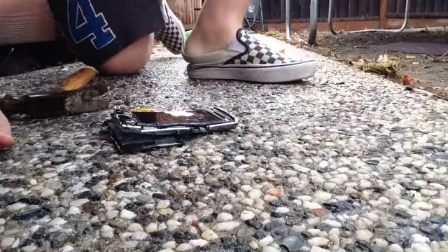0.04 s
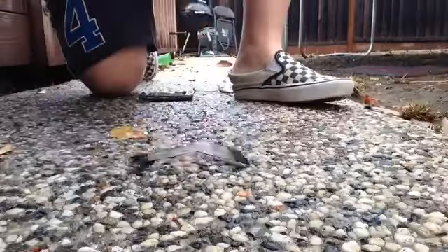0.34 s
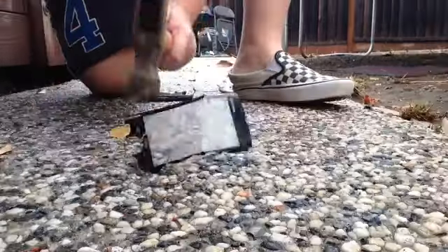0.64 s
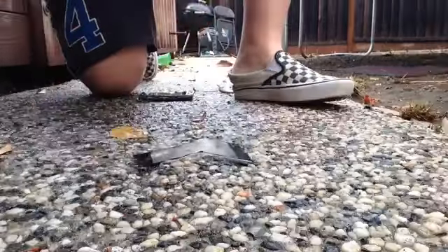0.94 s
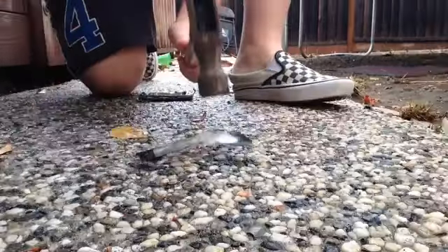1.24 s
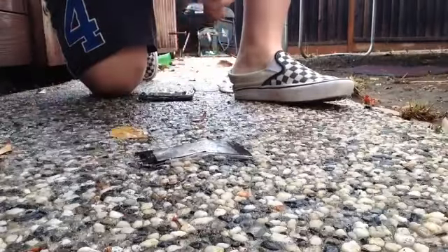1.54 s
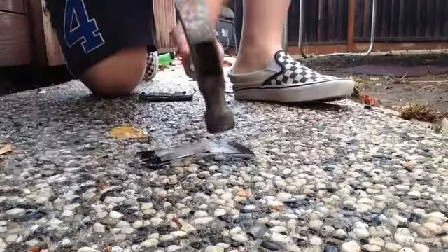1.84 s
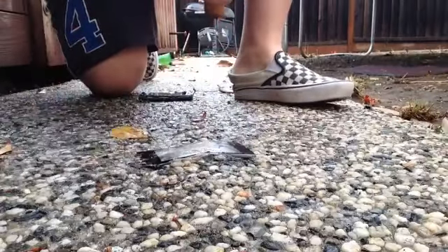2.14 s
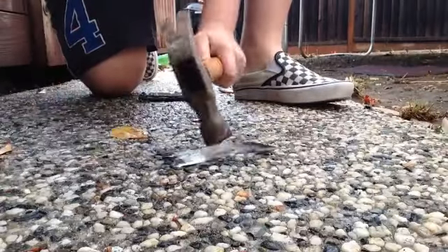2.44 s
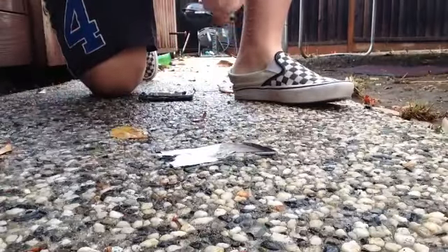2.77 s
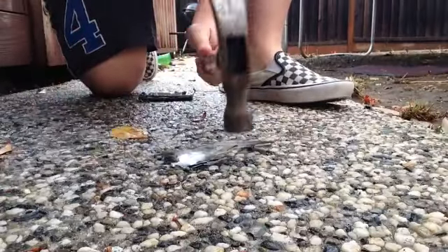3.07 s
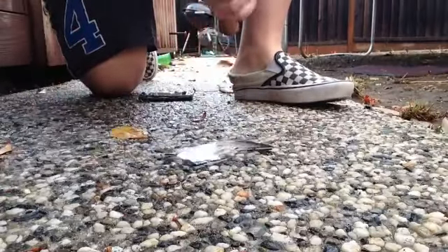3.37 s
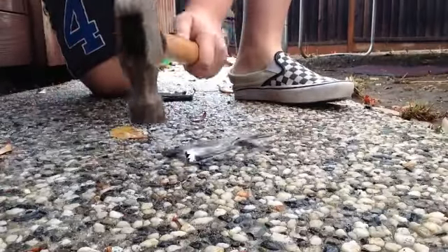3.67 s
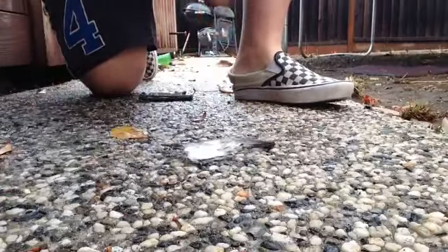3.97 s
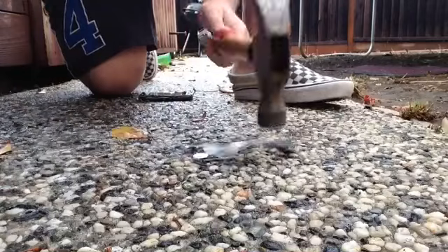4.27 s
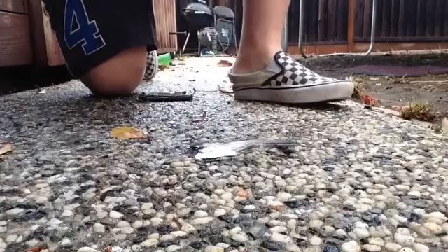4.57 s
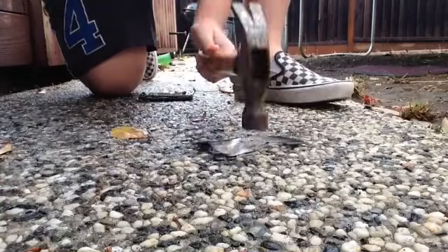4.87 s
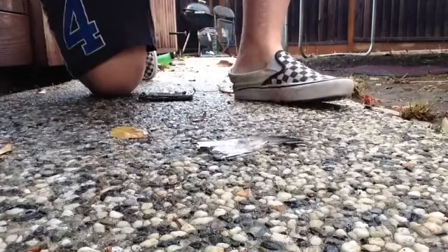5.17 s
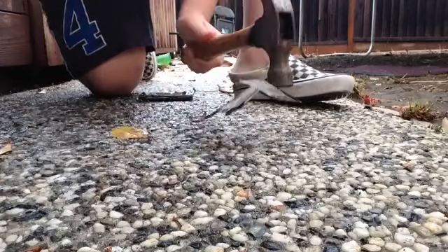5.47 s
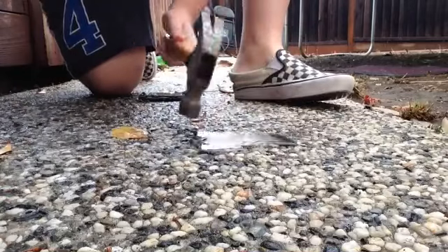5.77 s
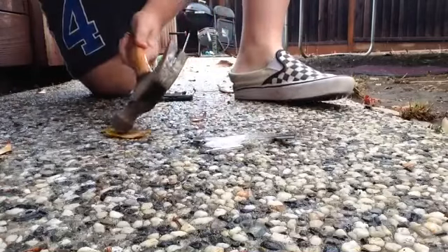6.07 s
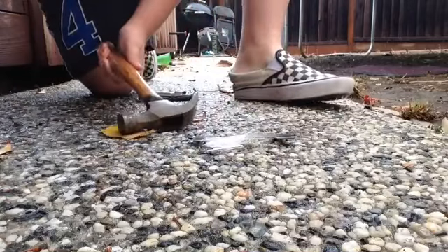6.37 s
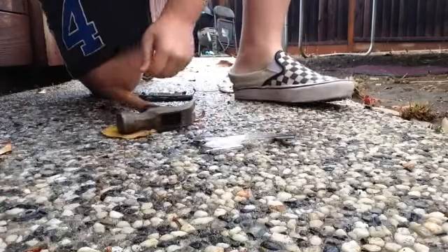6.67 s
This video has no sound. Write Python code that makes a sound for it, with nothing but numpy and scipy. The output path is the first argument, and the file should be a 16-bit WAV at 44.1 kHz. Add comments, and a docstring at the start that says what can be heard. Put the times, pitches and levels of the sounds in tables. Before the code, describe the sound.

A faint hum of distant traffic fills an outdoor yard. At about 0.6 seconds a hammer smashes into a phone on concrete, a sharp crack and thump so close that the microphone overloads, and broken pieces clack down just afterwards. Eight more blows follow steadily, about 0.6 seconds apart, until 5.4 seconds. Each crunches a little differently, some brighter, some with a duller knock, with a short echo off the fence and tiny splinters ticking on stone. From about 3.6 to 5 seconds the steel claw adds a faint, thin, high ring after the hits. At 5.65 seconds the wreck falls back with a thump and a clatter of bits. At 6 seconds the hammer clinks onto the pebbles, then again louder at 6.3, rocking and scraping softly on grit. Two lighter clinks near 6.7 and 6.9 seconds bring it to rest.

```python
"""A claw hammer smashes a phone on a pebbled concrete patio, so close that the microphone overloads.
The shell cracks, the slab thumps, the fenced yard echoes and splinters land all around.
Some blows set the steel claw ringing. A quick crush sounds bright; a hard push thumps higher.
The wreck flips and falls back, then the hammer is set down on the pebbles and rocks to rest.
Distant traffic hums underneath."""
import sys
import numpy as np
from scipy import signal
from scipy.fft import rfft, irfft
from scipy.io import wavfile
from scipy.ndimage import uniform_filter1d

SR = 44100
rng = np.random.default_rng(int(sys.argv[2]) if len(sys.argv) > 2 else 0)


def int16_out(signal):
    """Quantize to a 16-bit WAV file."""
    q = np.round(np.clip(np.atleast_2d(signal).T, -1, 1) * 32767)
    wavfile.write(sys.argv[1], SR, q.astype(np.int16))


N = 305172
SHOT = 8192  # samples in one short hit
T, TIME = np.arange(SHOT) / SR, np.arange(N) / SR  # seconds within one hit, and within the scene

# The hammer blows, with one soft rebound and, last, the wreck falling back. Each row: start in seconds,
# relative level in dB, crush time in seconds, knock boost in dB, pitch of the case in Hz,
# pitch of the struck spot in Hz, thump level in dB.
BLOWS = [ (0.594, -0.5, 0.0047, 4.5, 602, 3800, -11), (1.2122, -3.5, 0.0074, -0.5, 640, 1970, -14),
         (1.7883, -3, .004, 3.5, 447, 888, -15.5), (2.3849, -4.5, 0.0036, 10, 302, 1690, -10.5),
         (2.981, -5.5, 0.006, 0.5, 298, 1130, -22.5), (3.5865, -5.5, 0.0052, 10, 283, 1686, -22),
         (4.1880, -2.5, 0.006, -1, 680, 6220, -13.5), (4.804, -3.5, 0.0059, 5, 262, 864, -16.5),
         (4.883, -21.5, 0.0012, 11, 600, 2400, -34), (5.4344, -2, 0.0086, 1.5, 330, 2490, -16),
         (5.6504, -11, 0.001, 5, 460, 7000, -6.5)]
# The tone of a plastic or glass chip hitting stone. Each row: frequency in Hz, relative level in dB.
TICK = [(40, -36), (200, -8.5), (2000, -4), (6000, -5.5), (12000, -9), (15000, -15.5)]


def undb(db):
    """Turn decibels into a factor to multiply by."""
    return 10 ** (np.asarray(db) / 20)


def unit(x):
    """Scale a sound to the energy of one millisecond at full level."""
    return x * np.sqrt(SR / 1000 / np.sum(x ** 2))


def fade(t, t60):
    """A smooth dying away that is 60 dB down after t60 seconds."""
    return np.exp(-np.log(1000) * t / t60)


def add(out, start_s, x):
    """Mix x into out at the given time."""
    i = int(start_s * SR)
    out[i:i + len(x)] += x[:len(out) - i]


def axis_hz(size):
    """The frequencies that make up a sound of this many samples."""
    return np.maximum(np.fft.rfftfreq(size, 1 / SR), 1)


def shape(points, hz):
    """Join (Hz, value) points into a curve, giving each octave the same room."""
    point_hz, value = np.transpose(points)
    return np.interp(np.log(hz), np.log(point_hz), value)


def hump(hz, centre_hz, octaves):
    """A bell-shaped curve: 1 at its centre, half at the given number of octaves away."""
    return 1 / (1 + (np.log2(hz / centre_hz) / octaves) ** 2)


def colour(x, db):
    """Turn each frequency of a hit up or down by the curve db."""
    cepstrum = irfft(np.log(undb(db)))
    # folding onto the first half makes the filter ring after the hit, not before it
    cepstrum[1:SHOT // 2] *= 2
    cepstrum[SHOT // 2 + 1:] = 0
    return irfft(rfft(x) * np.exp(rfft(cepstrum)))


def high_pass(x, hz):
    """Turn down what lies below hz."""
    return signal.sosfilt(signal.butter(2, hz, "high", fs=SR, output="sos"), x)


def walk(rate):
    """A random drift of about 1 up or down that takes a new course rate times a second."""
    step = int(SR / rate)
    stairs = np.repeat(rng.standard_normal(N // step + 1), step)[:N]
    drift = uniform_filter1d(stairs, step)
    return drift / drift.std()


def grains(seconds, spread_db):
    """A dying burst of tiny clicks; a wider spread makes their sizes more unequal."""
    return rng.standard_normal(SHOT) * undb(spread_db * rng.standard_normal(SHOT)) * np.exp(-T / seconds)


def outdoors():
    """A background of distant traffic and hiss; a thin whine stops early, as the level dips briefly."""
    # The tone of the background noise. Each row: frequency in Hz, relative level in dB.
    background_tone = [(30, -27.5), (65, -17), (100, -16), (145, 2), (220, -2), (400, -2.5), (800, -10),
                       (1500, -19.5), (3400, -27.5), (8000, -29.5), (15000, -30.5)]
    # How the background noise swells and sinks, with soft rustles of movement near the end.
    # Each row: time in seconds, relative level in dB.
    background_level = [(0.47, -56.5), (3.0, -57), (3.77, -55.5), (3.94, -57), (5.48, -54), (5.88, -57.5),
                        (6.25, -51), (6.54, -57), (6.92, -53)]
    dip_s, dip_width_s, dip_db = 0.427, 0.015, -22
    whine_hz, whine_db = 1060, -54.5
    before_dip = TIME < dip_s
    noise = irfft(rfft(rng.standard_normal(N)) * undb(shape(background_tone, axis_hz(N))), N)
    background_db = np.interp(TIME, *np.transpose(background_level)) + 0.5 + 4.5 * before_dip
    background = noise / noise.std() * undb(background_db + 0.68 * walk(11))
    cycles = np.cumsum(whine_hz * (1 + .0025 * walk(70))) / SR
    whine = np.sqrt(2) * np.sin(2 * np.pi * cycles) * undb(whine_db + 2 * walk(55)) * before_dip
    dip = undb(dip_db * np.exp(-((TIME - dip_s) / dip_width_s) ** 2))
    return (background + whine) * dip


def splinters():
    """Pieces clack on stone, ring briefly and skitter to rest; smaller ones ring higher and tick more."""
    # The larger pieces landing. Each row: start in seconds, level in dB, ringing pitch in Hz.
    pieces = [ (0.2528, -34, 5600), (0.2923, -37, 4820), (0.7326, -14.5, 1280), (0.7851, -22, 1666),
              (0.891, -28.5, 2400), (.8975, -22.5, 3700), (1.0914, -43, 5950), (1.331, -30, 2905),
              (2.0556, -45, 1860), (2.1276, -45.5, 1920), (3.7727, -32, 3500), (4.331, -27.5, 3000),
              (5.616, -25.5, 3690), (5.641, -19.5, 5000), (5.736, -31.5, 3300)]
    even_hz, tick_db_per_octave = 3500, 14  # at even_hz the tick is as strong as the body
    out, hz = np.zeros(N), axis_hz(SHOT)
    for start_s, db, ring_hz in pieces + chips(count=2):
        ring = np.sin(2 * np.pi * ring_hz * T) * fade(T, t60=0.01)
        clack = colour(grains(.0005, spread_db=2), 45 * hump(hz, ring_hz, octaves=1.5))
        body = unit(.8 * unit(ring) + unit(clack))
        skitter = unit(grains(.002, spread_db=7)) + .5 * unit(grains(.012, spread_db=12))
        tick = colour(skitter, shape(TICK, hz))
        tick_db = tick_db_per_octave * np.log2(ring_hz / even_hz)
        add(out, start_s, undb(db) * unit(body + undb(tick_db) * unit(tick)))
    return out


def ripple(width_hz):
    """The many weak resonances of a broken part, as a random wavy curve across the frequencies."""
    size = max(int(width_hz * SHOT / SR), 1)
    jagged = rng.standard_normal(SHOT // 2 + 1)
    curve = uniform_filter1d(uniform_filter1d(jagged, size), size)
    return curve / curve.std()


def blows():
    """Each blow cracks the shell, with a tone set by the spot it hits, thumps the slab and sprays crumbs."""
    # The tone of the breaking shell. Each row: frequency in Hz, relative level in dB.
    crack_tone = [(40, -33.5), (120, -5), (250, 3.5), (600, 4), (1300, 0), (2600, 1.5), (3500, -0.5),
                  (5500, -1), (8000, -4.5), (11000, -5), (15000, -5.5)]
    # The pitches at which the shell rings on every blow. Each row: pitch in Hz, boost in dB.
    shell_rings = [(880, 1.5), (1680, 4), (3560, 0), (4200, 2), (5410, 2.5), (6200, 1)]
    usual_crush_s = .005
    full_thump_hz, thump_db_per_octave = 234, 24.5  # a thump of 0 dB has the pitch full_thump_hz
    out, hz = np.zeros(N), axis_hz(SHOT)
    click = 1. * (T == 0)
    shell_db = sum(db * hump(hz, ring_hz, octaves=.08) for ring_hz, db in shell_rings)
    for start_s, db, crush_s, knock_db, case_hz, spot_hz, thump_db in BLOWS:
        # a quick crush is bright, a long one sends more into the yard
        doublings = np.log2(crush_s / usual_crush_s)
        treble_db = 2 - 3.5 * doublings
        yard_db = -7 + 3.5 * doublings
        spot_db = 2.5 * hump(hz, case_hz, octaves=0.23) + 5 * hump(hz, spot_hz, octaves=0.099)
        ripple_db = 2.2 * ripple(width_hz=110) * hump(hz, 5000, octaves=1.6)
        tone_db = knock_db * hump(hz, 550, octaves=1.6) + treble_db * hump(hz, 9400, octaves=1.0)
        spectrum_db = shape(crack_tone, hz) + shell_db + spot_db + ripple_db + tone_db
        # the hammer's face lands, the case gives way, then loose parts buzz against each other
        landing = 0.41 * unit(click) + .6 * unit(grains(0.001, spread_db=3.5))
        crush = unit(grains(crush_s, spread_db=6))
        buzz = 0.19 * unit(grains(0.013, spread_db=-0.5))
        crack = undb(db + 4.0) * unit(colour(landing + crush + buzz, spectrum_db))
        # a harder push stiffens the contact with the slab and raises the thump's pitch
        thump_hz = full_thump_hz * 2 ** (thump_db / thump_db_per_octave)
        thump = undb(thump_db) * np.cos(2 * np.pi * thump_hz * T) * fade(T, t60=0.036)
        spray = colour(grains(.06, spread_db=15), shape(TICK, hz) + 2 * ripple_db)
        crumbs = undb(db - 14) * unit(spray)
        # the flattened case gives one dull knock against the slab
        knock = undb(db + knock_db - 14.5) * unit(np.sin(2 * np.pi * case_hz * T) * fade(T, t60=0.034))
        add(out, start_s, crack + knock + thump + crumbs)
        # the yard echoes the whole blow as one sharp bang
        bang = undb(db + 6.0) * unit(colour(click, spectrum_db))
        add(out, start_s, undb(yard_db) * yard(bang + 0.28 * thump))
    return out


def yard(x):
    """Fence and house wall scatter the sound, differently for each spot; the highest tones die first."""
    # The yard's echo. Each row: frequency in Hz, relative level in dB, seconds to fade by 60 dB.
    bands = [(60, -10.5, .25), (149, 8.5, 0.37), (357, -5, 0.55), (790, -5.5, 0.5), (1820, -8.5, 0.43),
             (4030, -3.5, 0.36), (7000, 2, 0.35), (11200, 2, 0.29), (15000, 6.5, 0.2)]
    t = np.arange(SR // 2) / SR
    hz, noise = axis_hz(len(t)), rfft(rng.standard_normal(len(t)))
    centres_hz = [row[0] for row in bands]
    echo = 0
    for (_, db, t60), share in zip(bands, np.eye(len(bands))):
        band = irfft(noise * np.interp(np.log(hz), np.log(centres_hz), share), len(t))
        echo = echo + undb(db) * band * fade(t, t60)
    echo = echo * (1 - np.exp(-(t / 0.012) ** 2))  # the echo takes a moment to build
    return signal.fftconvolve(x, echo / np.sqrt(np.sum(echo ** 2)))


def chips(count):
    """List the chips each blow throws; the longer one flies, the farther and fainter it lands."""
    shortest_s, longest_s = 0.1, 0.21
    chip_db, loss_db_per_s, typical_hz = -25, 72.5, 3300
    rows = []
    for start_s, blow_db, *_ in BLOWS:
        for throw, size in rng.random((count, 2)):
            flight_s = shortest_s + throw * (longest_s - shortest_s)
            landing_db = blow_db + chip_db - loss_db_per_s * flight_s
            ring_hz = typical_hz * 2 ** (1 - 2 * size)
            rows.append((start_s + flight_s, landing_db, ring_hz))
    return rows


def claw():
    """The steel claw rings at two close pitches that throb; its sound sweeps past the microphone."""
    # The claw singing as the hammer swings back up. Each row: start in seconds, level in dB.
    rings = [(2.9807, -59.5), (3.587, -45.5), (4.189, -40.5), (4.8041, -47.5)]
    claw_hz, throb_hz, facing_s = 7148, 8.6, 0.11
    out = np.zeros(N)
    t = np.arange(SR // 2) / SR - facing_s  # zero when the claw faces the microphone
    pair = np.sin(2 * np.pi * claw_hz * t) + .75 * np.sin(2 * np.pi * (claw_hz + throb_hz) * t)
    sweep = np.exp(-(t / np.where(t < 0, .08, .14)) ** 2)  # swells quickly, leaves more slowly
    for start_s, db in rings:
        add(out, start_s, undb(db) * pair * sweep)
    flicker = undb(4 * walk(32))
    return out * flicker


def touches():
    """List the hammer's touches on the ground: each set-down, then softer rocking that slows down."""
    # The hammer set down on the pebbles. Each row: start in seconds, level in dB, favoured pitch in Hz,
    # grit level in dB against the touch, number of rocking taps, seconds to the first of them.
    set_downs = [(5.9942, -11, 820, -7.5, 1, .075), (6.2965, -6.5, 2050, -26, 4, .0215),
                 (6.723, -11.5, 4430, -31, 1, 0), (6.8709, -16, 2600, -44, 0, 0)]
    rock_db, rock_hz, rock_grit_db, slowing = -15, 1280, -21, 1.07
    rows = []
    for start_s, db, centre_hz, grit_db, count, gap_s in set_downs:
        rows.append((start_s, db, centre_hz, grit_db))
        for delay_s in np.cumsum(gap_s * slowing ** np.arange(round(count))):
            rows.append((start_s + delay_s, db + rock_db, rock_hz, rock_grit_db))
    return rows


def clinks():
    """The hammer chatters on the pebbles; the spot that touches decides which of its pitches ring most."""
    # The ringing of head and handle. Each row: pitch in Hz, relative level in dB, seconds to fade 60 dB.
    hammer_rings = [(194, 8.5, 0.085), (521, 3.5, 0.21), (816, 4, 0.062), (1027, 9.5, 0.044),
                    (1182, 7, 0.143), (1433, 1, 0.042), (1665, -1.5, 0.17), (1885, -3, 0.023),
                    (2623, -0.5, 0.094), (3050, -8, 0.17), (4450, -36.5, 0.045), (5040, -19, 0.053),
                    (5310, -5.5, 0.092), (4900, -25, 0.038), (7300, -23, .12), (7300, -37, 0.16)]
    # The tone of sand under steel. Each row: frequency in Hz, relative level in dB.
    grit_tone = [(40, -23), (300, 15), (2500, -4), (5200, 4), (8000, -10), (12000, -22), (15000, -14)]
    out, hz = np.zeros(N), axis_hz(SHOT)
    for start_s, db, centre_hz, grit_db in touches():
        ring = np.zeros(SHOT)
        for ring_hz, ring_db, t60 in hammer_rings:
            # the ground shifts the pitch a little and muffles the head, leaving a weak ring
            shifted_hz = ring_hz * (1 + .012 * rng.standard_normal())
            decay = fade(T, t60=0.017) + 0.09 * fade(T, t60)
            strength = undb(ring_db + 24.3 * hump(ring_hz, centre_hz, octaves=1.0))
            ring += strength * decay * np.sin(2 * np.pi * (shifted_hz * T + rng.random()))
        chatter_db = 30 * hump(hz, centre_hz, octaves=0.76) + shape(grit_tone, hz) / 2
        chatter = colour(grains(0.0036, spread_db=0.5), chatter_db)
        contact = (unit(ring) + 0.4 * unit(chatter)) * (1 - np.exp(-T / 0.0012))
        grit = colour(grains(0.014, spread_db=-0.5), shape(grit_tone, hz))
        thud = np.sin(2 * np.pi * 195 * T) * fade(T, t60=0.017) * (1 - np.exp(-T / 0.0051))
        clink = unit(contact) + undb(grit_db) * unit(grit) + undb(-14) * unit(thud)
        add(out, start_s, undb(db) * clink)
    return high_pass(out, hz=124)


def scrapes():
    """The steel head drags over loose sand between the clinks."""
    # The hammer dragging. Each row: start in seconds, end in seconds, level in dB.
    drags = [(6.005, 6.154, -48), (6.261, 6.402, -46), (6.376, 6.638, -59.5)]
    # The tone of the dragged sand. Each row: frequency in Hz, relative level in dB.
    sand_tone = [(40, -25), (500, 15.5), (2500, -7.5), (5200, 5), (9000, -5.5), (15000, -6)]
    crunch = rng.standard_normal(N) * undb(8 * rng.standard_normal(N) + 4 * walk(120))
    sand = irfft(rfft(crunch) * undb(shape(sand_tone, axis_hz(N))), N)
    loudness = np.zeros(N)
    for start_s, end_s, db in drags:
        add(loudness, start_s, undb(db) * signal.windows.tukey(int((end_s - start_s) * SR)))
    return loudness * sand / sand.std()


def scene():
    """Everything on the patio, with its echo, in one channel."""
    bits = high_pass(splinters(), hz=200)
    steel = clinks() + scrapes()
    echo = yard(undb(-13.5) * bits + undb(-13) * steel)[:N]
    return (blows() + claw() + bits + steel + echo + outdoors())[None]


def record(dry):
    """The microphone thins the deep bass and overloads on the peaks; the highest treble is cut."""
    top_hz = 15450
    thin = high_pass(dry, hz=67)
    overloaded = thin / (1 + thin ** 4) ** (1 / 4)
    return signal.sosfilt(signal.ellip(10, .2, 70, top_hz, fs=SR, output="sos"), overloaded)


dry = scene()
out = record(dry)
int16_out(out)
```